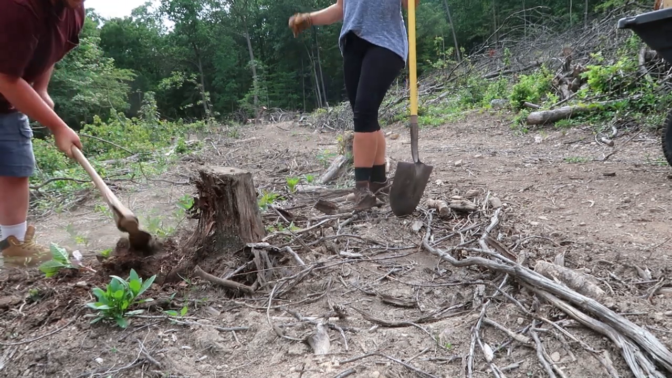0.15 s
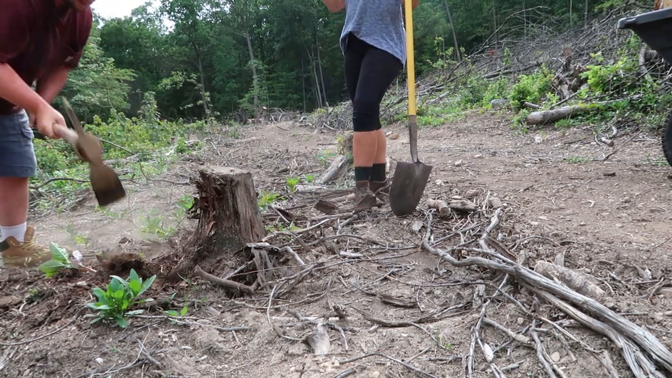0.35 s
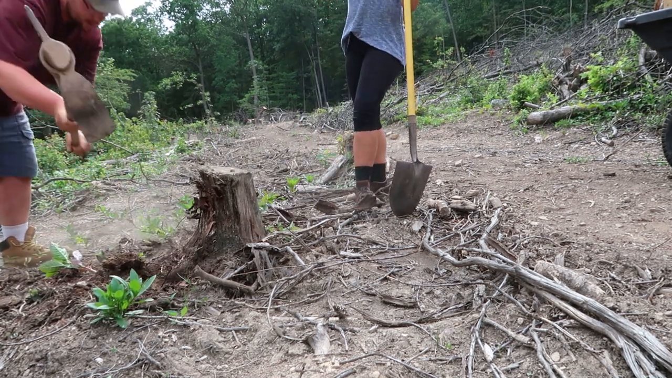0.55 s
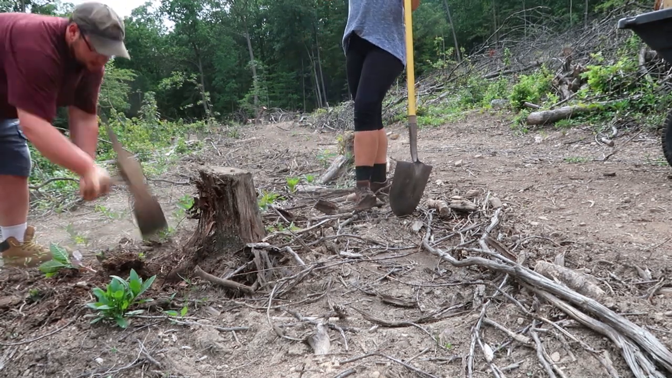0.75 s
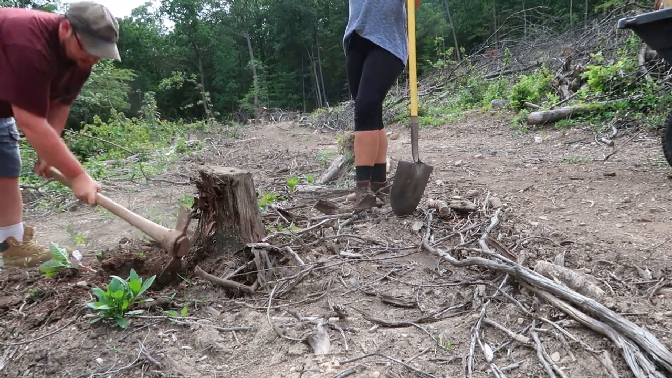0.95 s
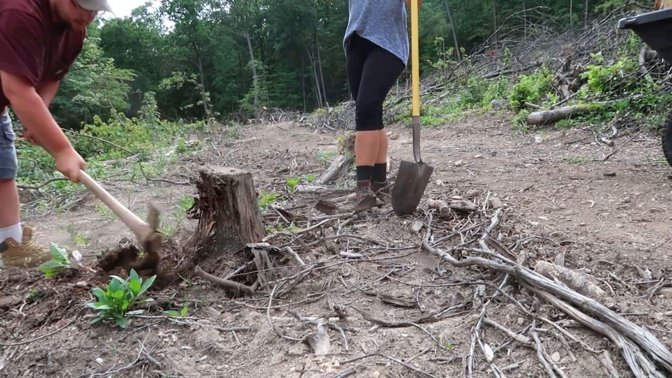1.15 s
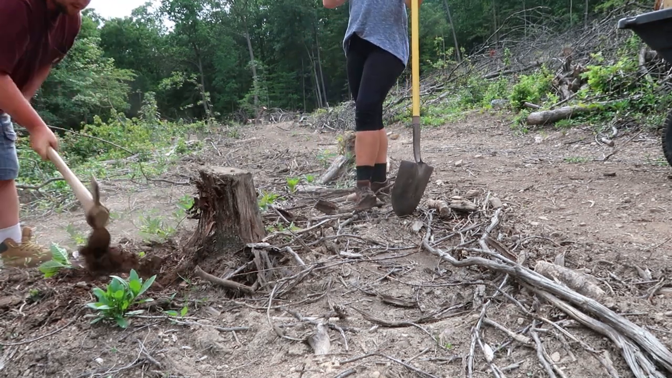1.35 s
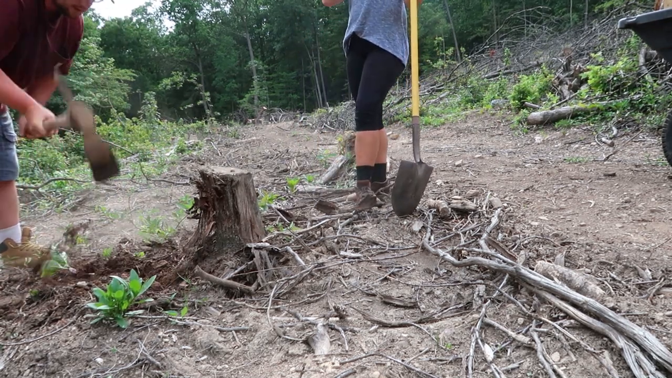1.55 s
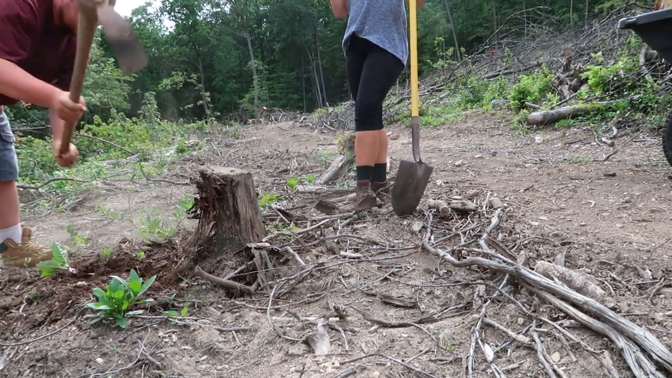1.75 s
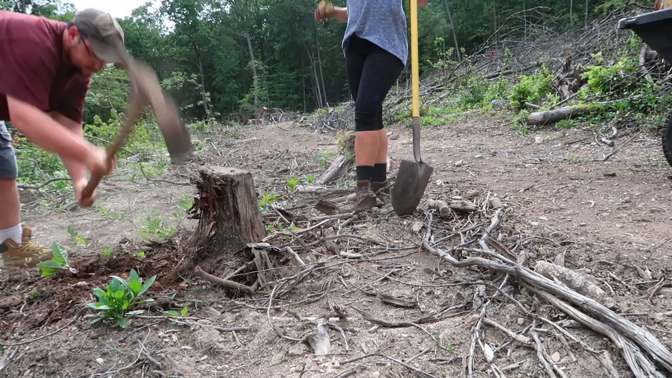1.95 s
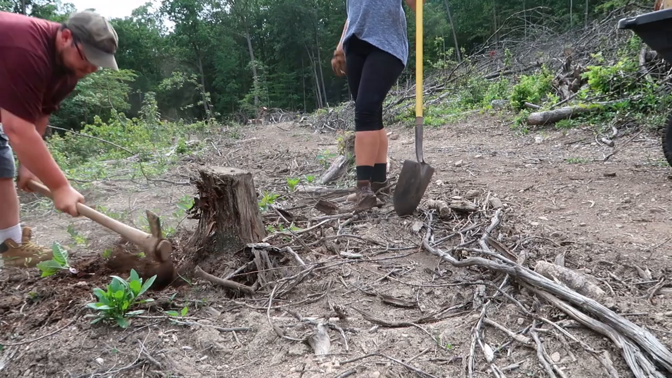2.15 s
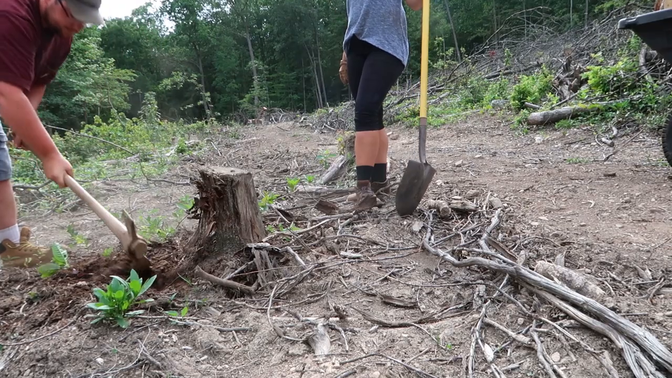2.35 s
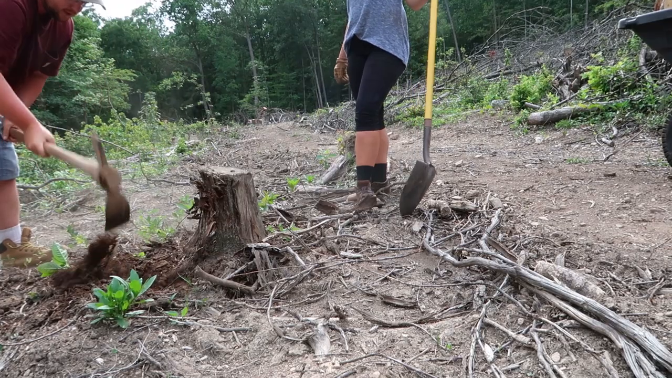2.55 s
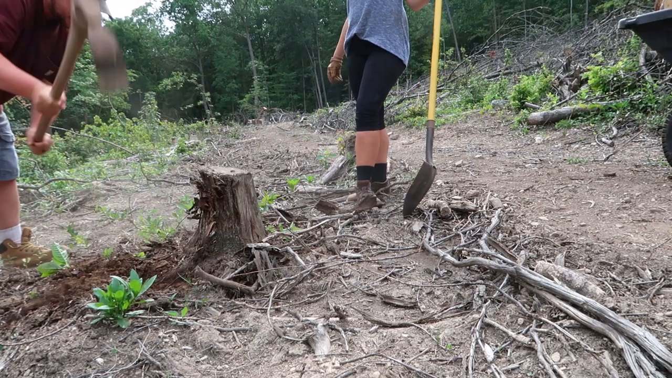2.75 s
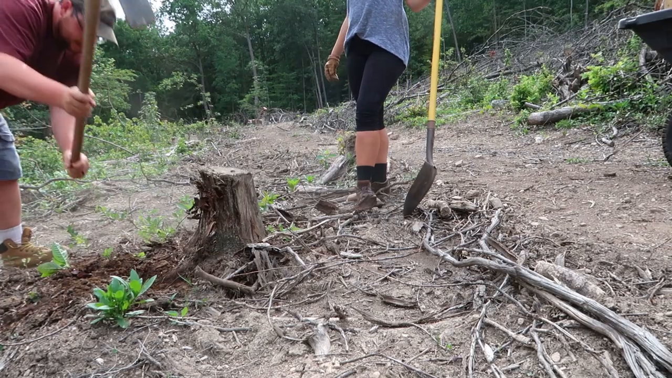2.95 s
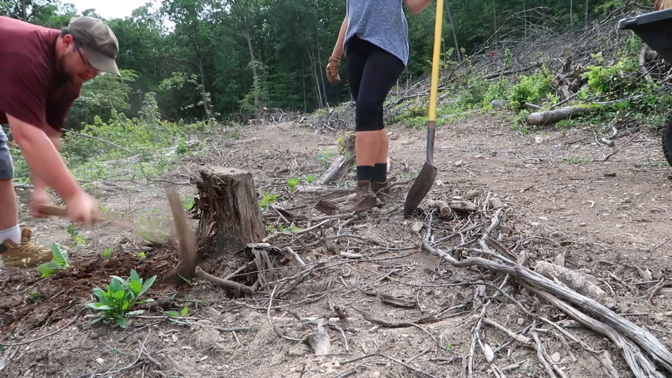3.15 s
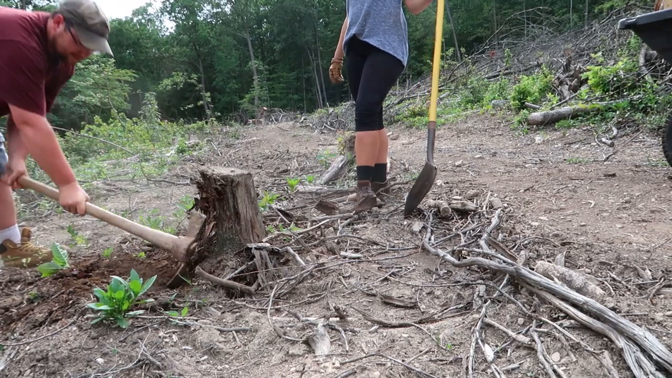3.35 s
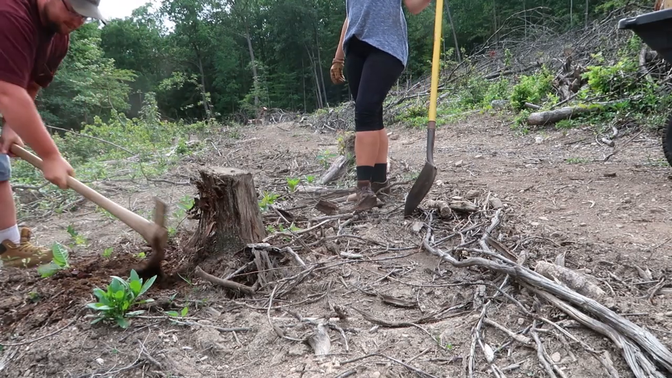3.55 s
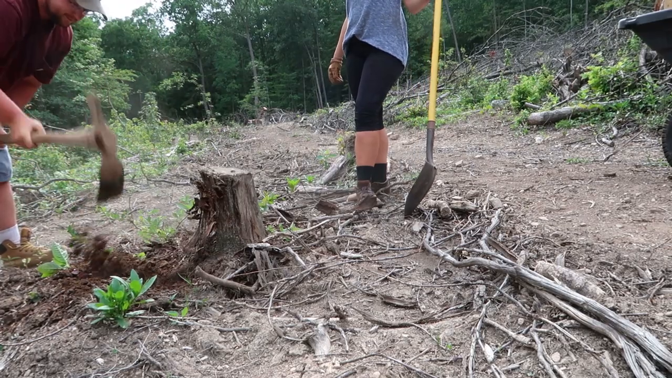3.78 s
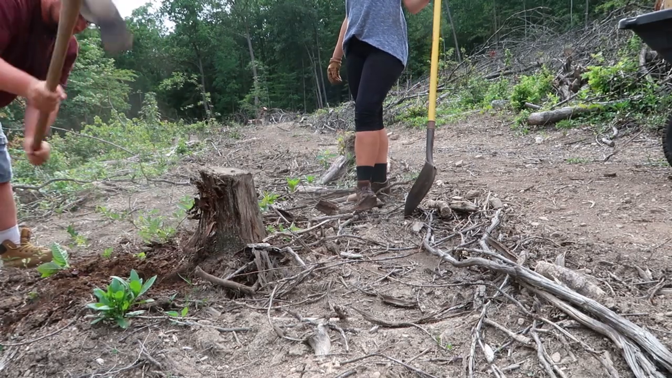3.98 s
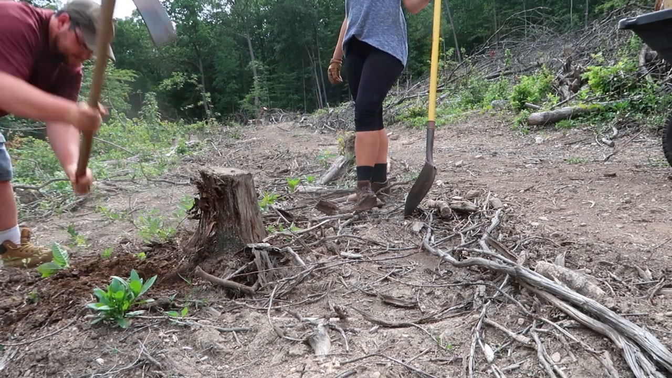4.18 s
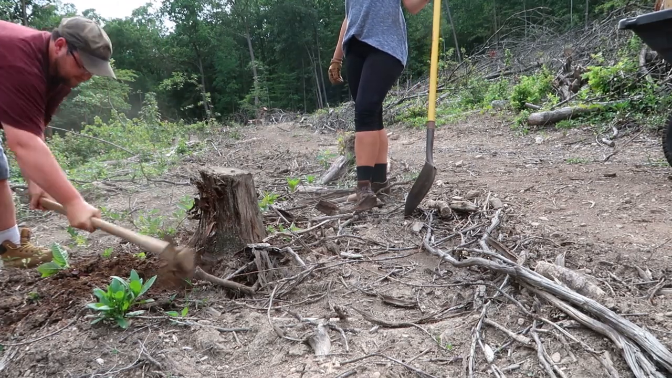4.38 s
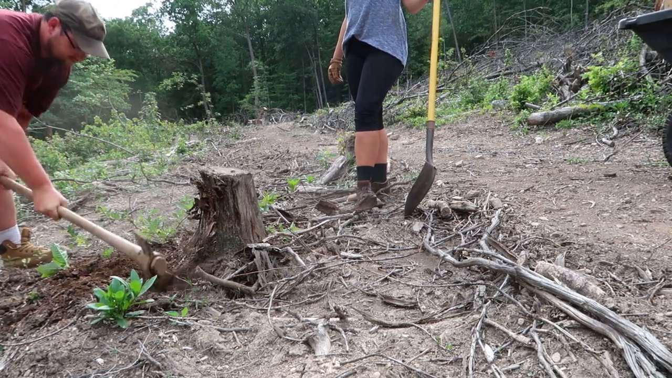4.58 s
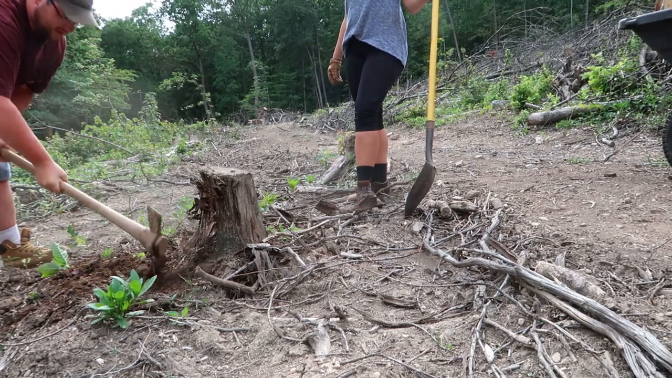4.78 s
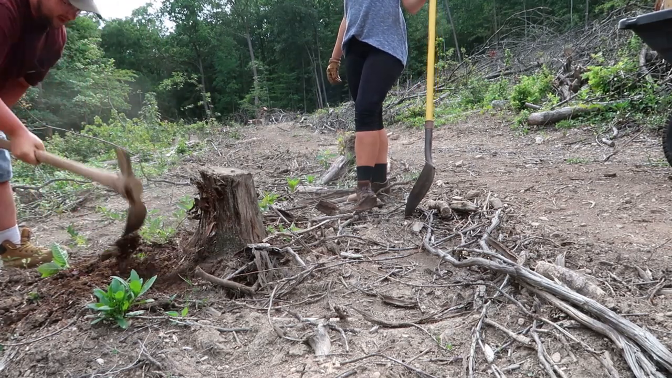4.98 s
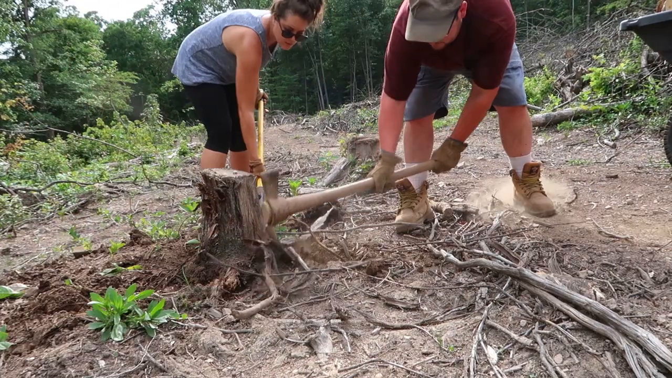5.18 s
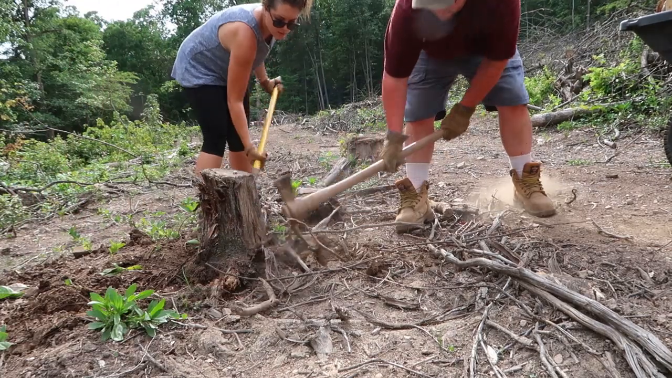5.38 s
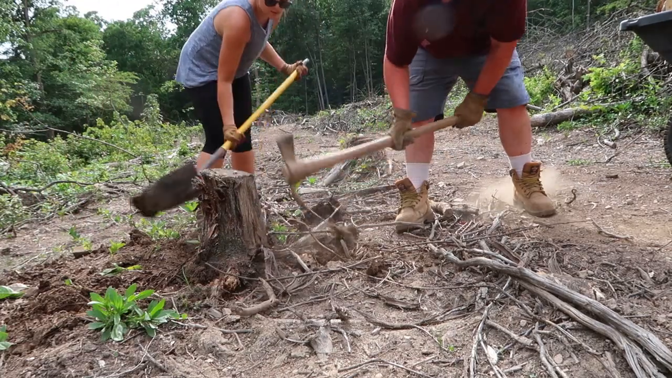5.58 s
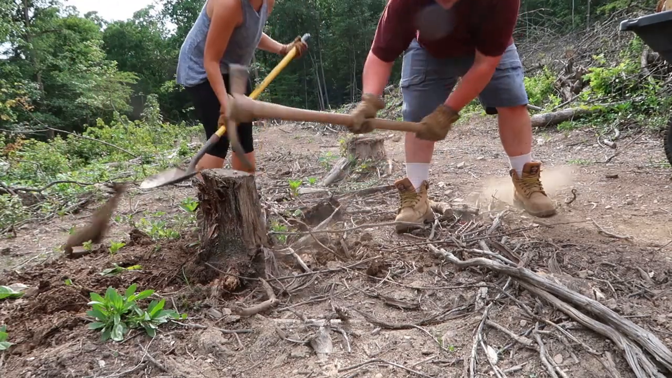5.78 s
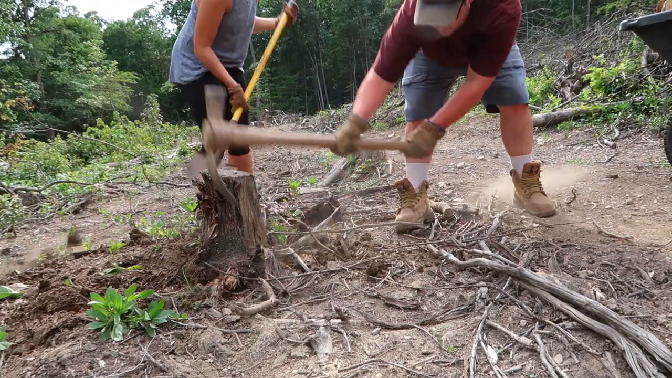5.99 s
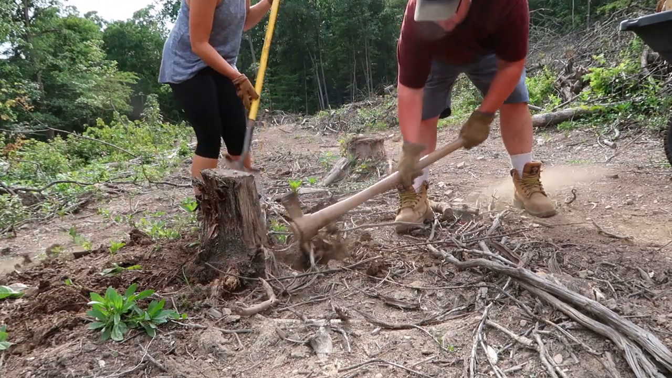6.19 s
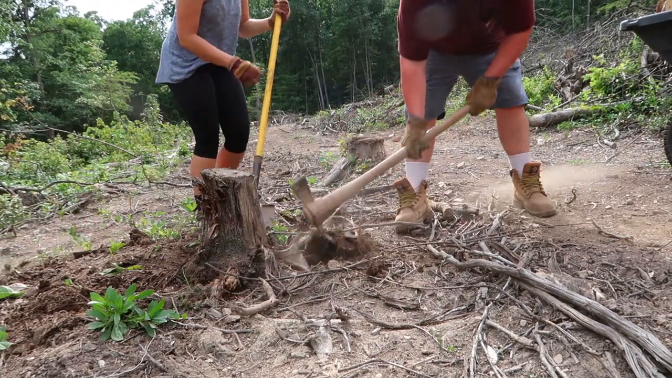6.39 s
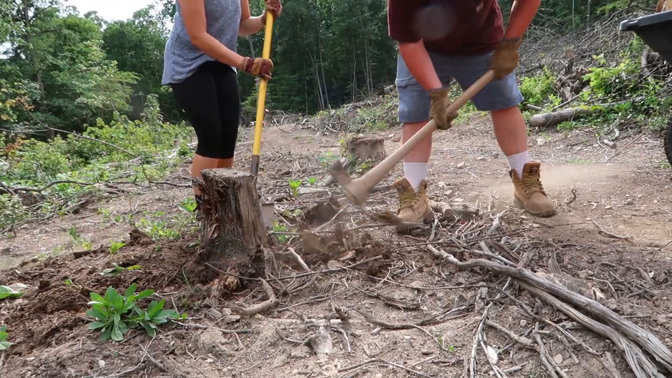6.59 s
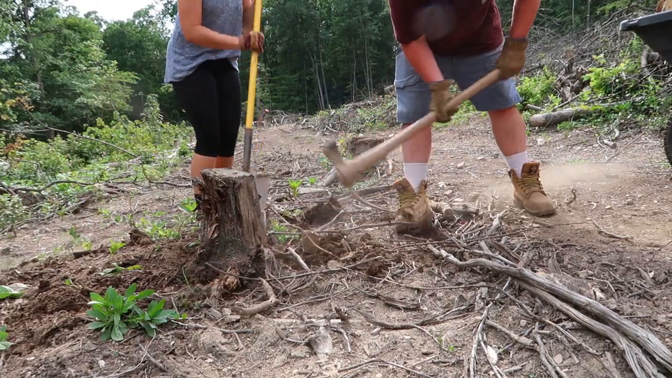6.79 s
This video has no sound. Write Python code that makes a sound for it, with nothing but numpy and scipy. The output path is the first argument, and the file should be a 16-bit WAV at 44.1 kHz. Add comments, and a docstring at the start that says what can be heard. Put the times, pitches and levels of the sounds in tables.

```python
"""A mattock bites into stony soil by a stump in a forest clearing; later a shovel scrapes beside it.
Each stroke is a string of grinding bursts: stone cracks, roots knock, grit sprays and the steel head rings.
Low pushes thump the ground, loose soil trickles and rumbles back, and pebbles tick as short bursts.
Trees return a faint echo of the work; light wind and a drone (shaped noise) and a bird (sines) lie far off."""
import sys
import numpy as np
from scipy import signal
from scipy.fft import rfft, irfft, next_fast_len
from scipy.io import wavfile
from scipy.ndimage import uniform_filter1d, map_coordinates

SR = 44100
rng = np.random.default_rng(int(sys.argv[2]) if len(sys.argv) > 2 else 0)


def generate_wav(sig):
    """Save sig (samples, or channels by samples) to the path in sys.argv[1] as 16-bit PCM at SR."""
    pcm = np.round(np.clip(np.atleast_2d(sig).T, -1, 1) * 32767).astype(np.int16)
    wavfile.write(sys.argv[1], SR, pcm)


N = 301203  # length [samples]

# far wind and drone: (time [s], wind level [dB], drone level [dB])
FAR_LEVELS = [(0, -55.5, -60.5), (.6, -62, -57), (1.8, -59, -59), (2.7, -59.5, -60.5), (4.1, -63, -61.5),
              (5.1, -56.5, -57), (6, -58, -54), (6.83, -57.5, -66)]
# colour of the far wind: (frequency [Hz], relative level [dB])
WIND_COLOUR = [(12, -34), (20, -3), (75, -18), (102, -18), (283, -26.5), (300, -17.5), (390, -54.5),
               (660, -120)]
# colour of the far drone: (frequency [Hz], relative level [dB])
DRONE_COLOUR = [(88, -39.5), (150, -8.5), (287, -6), (319, -5), (454, -2), (481, -1.5), (693, -3.5),
                (808, -1.5), (941, -9.5), (1340, -11), (1450, -16.5), (2500, -42.5), (3250, -62),
                (5500, -120)]
# faint far bird notes: (start [s], length [s], starting pitch [Hz], peak level [dB])
BIRD_NOTES = [(.555, .04, 3850, -75), (.66, .045, 4120, -70), (.74, .13, 3650, -71)]
# echo of the clearing: (frequency [Hz], t60 [s])
TREE_DECAY = [(200, 0.62), (2000, 0.23), (12000, 0.33)]
# showers of loose soil: (full at [s], held [s], crumbs level [dB], dust level [dB])
SOIL_SHOWERS = [(0, 0.015, -53.5, -60), (.2, 0.036, -63.5, -65), (.63, .6, -65.5, -79.5),
                (1.53, 0.02, -62, -62), (1.75, 0.13, -69, -73.5), (2.33, 0.11, -64, -75),
                (2.51, 0.23, -62, -67), (3.44, 0.02, -61, -68.5), (4.62, 0.016, -59, -68.5),
                (4.78, 0.066, -65, -70.5), (5.15, 0.064, -60.5, -75.5), (5.36, 0.11, -52.5, -52),
                (5.64, 0.11, -56.5, -62), (5.9, 0.22, -62, -65), (6.42, 0.19, -60, -62),
                (6.8, .05, -62, -82.5)]
# soil between showers: (crumbs level [dB], dust level [dB])
SOIL_BED = (-73.5, -77.5)
# colour of the crumbs: (frequency [Hz], relative level [dB])
CRUMB_COLOUR = [(710, -16), (1200, -3.5), (1260, 0), (1340, -1.5), (1730, -3), (1890, -2.5), (8000, -13),
                (10400, -42), (17600, -120)]
# colour of the dust: (frequency [Hz], relative level [dB])
DUST_COLOUR = [(3530, -40.5), (6000, -10), (7730, -6), (10600, 1), (15000, -0.5), (16100, -7.5),
               (16300, -12), (16500, -49.5)]
# pebbles landing: (time [s], peak level before spray [dB], centre [Hz])
PEBBLE_LANDINGS = [(0.1242, -31.5, 11500), (0.183, -30, 3200), (0.3446, -47, 3500), (1.026, -41, 2380),
                   (1.1747, -44.5, 2380), (1.2237, -43, 2358), (1.4077, -35.5, 13300),
                   (1.5369, -41.5, 4180), (2.707, -42, 9700), (2.9755, -44, 5080), (3.5548, -46, 2350),
                   (3.5982, -36.5, 1408), (4.596, -35, 2532), (4.7067, -32.5, 2140), (4.774, -41, 2410),
                   (4.81, -46, 13000), (4.854, -47, 13500), (5.1477, -33, 11200), (5.206, -34, 12300),
                   (5.3292, -35, 3500), (5.3467, -31, 10400), (5.462, -27, 12300), (5.632, -41, 1990),
                   (5.8046, -14.5, 12700), (6.3, -40, 12400), (6.509, -34, 11500), (6.574, -41, 10500),
                   (6.627, -25.5, 6300), (6.633, -23.5, 13700), (6.6601, -27.5, 2180),
                   (6.6615, -29.5, 6970), (6.6862, -37, 12100), (6.7772, -39.5, 10870)]
# soft lumps landing: (time [s], peak level before spray [dB], centre [Hz])
CLOD_LANDINGS = [(0.468, -48, 700), (2.559, -40.5, 530), (2.603, -45.5, 430), (2.647, -46, 427),
                 (3.447, -57, 382), (5.833, -36.5, 845)]
# a hard stone chips the steel: (time [s], peak level before spray [dB], centre [Hz])
STONE_CLINKS = [(5.12, -28, 3010)]
# shovel blade modes: (frequency [Hz], relative level [dB], t60 [s])
BLADE_MODES = [(890, -8, .25), (1450, -4, .1), (1960, -7, .15), (2225, 2, .28), (2400, 1, .18),
               (2760, -8, .25), (3340, -5, .18), (3640, -7, .22), (3810, -6, .18), (4460, -6, .18),
               (4915, -4, .13), (6350, -7, .13), (6800, -8, .13), (7700, -8, .11)]
# pushes of the shovel over stones: (full at [s], held [s], rasp level before jerks [dB])
SHOVEL_PUSHES = [(5.636, 0.013, -56), (5.697, .035, -48.5), (5.742, 0.039, -40), (5.835, 0.007, -52.5)]
# jerks of the mattock head through grit: (full at [s], held [s], rasp level before jerks [dB])
HEAD_DRAGS = [(5.345, 0.004, -50), (5.43, 0.0045, -41), (5.485, 0.0036, -44), (5.54, 0.0056, -50.5)]
# the edge slides through loose soil and bites: (bite [s], slide length [s])
EDGE_BITES = [(0.924, .016), (3.274, .008), (4.459, .009)]
# the head's weight lands in the ground: (time [s], thump peak level [dB])
GROUND_THUMPS = [(0.9197, -24.5), (0.9253, -23.5), (0.9312, -25), (0.9464, -24), (0.989, -32), (2.138, -25),
                 (2.1685, -27), (2.2133, -28), (2.2413, -34), (3.276, -20.5), (3.281, -26), (3.2868, -25),
                 (3.2959, -24), (3.3388, -36), (4.459, -17), (4.4659, -11.5), (4.5118, -35), (5.22, -34),
                 (5.259, -20), (6.202, -32), (6.251, -40), (6.494, -36.5)]
# mattock head modes when free: (frequency [Hz], relative level before scatter [dB], t60 before damping [s])
HEAD_MODES = [(740, -8, .06), (1480, -5, .05), (1900, -8, .04), (2430, 0, .12), (3090, -8, .08),
              (3380, -9, .08), (3820, -11, .12), (4600, -9, .08), (5040, -11, .07), (5750, -10, .08),
              (6440, -10, .09), (6930, -13, .08), (8050, -14, .09), (8700, -15, .08), (9480, -15, .12),
              (10800, -16, .12), (11250, -18, .16), (11900, -17, .1), (12700, -17, .1), (14600, -18, .12)]
# contacts: (time [s], crack peak level [dB], crack centre [Hz], knock level re crack [dB], grinding t60 [s])
MATTOCK_CONTACTS = [(0.9188, -34, 2400, 13.5, 0.065), (0.9258, -17, 1520, 8.5, 0.012),
                    (0.9325, -32.5, 2640, 12, 0.039), (0.9442, -26.5, 2270, 6.5, 0.067),
                    (0.964, -30, 2250, -3, 0.11), (0.9798, -23, 2140, 0.5, 0.054),
                    (0.9913, -27, 2400, -12, 0.017), (1.3101, -29.5, 2240, -1, 0.042),
                    (2.139, -1, 4520, -12.5, 0.018), (2.1465, -19.5, 2040, 4.5, 0.048),
                    (2.1688, -41.5, 1550, 16, 0.044), (2.2052, -29.5, 1970, -12, 0.079),
                    (2.2144, -36, 2290, 11, 0.036), (2.2405, -37, 2270, 8.5, 0.12),
                    (2.2636, -46, 2400, 3, 0.054), (3.2731, -9.5, 2880, -14, 0.053),
                    (3.277, -3, 2440, -5, 0.019), (3.2812, -24.5, 2540, 17, 0.029),
                    (3.287, -25, 2720, -5, 0.02), (3.2964, -43, 2370, 10, 0.15),
                    (3.3393, -17.5, 2080, -6, 0.039), (4.4591, -2.5, 2060, -4, 0.019),
                    (4.4654, -29, 3180, 3, 0.072), (4.5106, -38, 2260, -3, 0.28),
                    (4.6134, -38.5, 2380, 3.5, 0.065), (5.222, -7, 5000, -13.5, 0.077),
                    (5.23, -29.5, 2030, 16.5, 0.09), (5.246, -13.5, 1350, 8, 0.02),
                    (5.2602, -50, 2080, 8, 0.031), (5.3465, -32.5, 2620, 2, 0.019),
                    (5.3833, -34, 2300, 3, 0.15), (5.403, -30.5, 1350, 11, 0.045),
                    (5.4927, -14.5, 5300, -14.5, 0.035), (6.203, 4, 2120, -11.5, 0.013),
                    (6.2123, -19, 2520, 7, 0.051), (6.2238, -13.5, 2210, -11, 0.025),
                    (6.2494, -42.5, 2370, 14, 0.025), (6.38, -36, 3870, -10.5, 0.2),
                    (6.4105, -17, 4030, -11, 0.038), (6.4442, -45, 1950, 8, 0.02),
                    (6.4943, -37.5, 6600, 0.5, 0.031)]
# what each stroke meets: (stroke start, just before its first contact [s],
# grit spray re crack at the usual crack pitch [dB], steel ring of a 0 dB crack [dB],
# rumble of soil sliding back [dB])
STROKE_SETTINGS = [(0.91, -35, -19.5, -53), (1.3, -2.5, -20, -64.5), (2.13, -24, -21, -66),
                   (2.2, -18.5, -18.5, -60), (3.27, -23, -20, -56.5), (3.33, -12, -20, -59.5),
                   (4.45, -36, -22.5, -60), (4.5, -7, -17.5, -50), (5.21, -12, -39, -60),
                   (5.34, -14, -33, -56.5), (6.19, -42, -19, -59.5), (6.37, -4, -17.5, -54)]

BIRD_SAG_HZ_PER_S = 1500
ECHO_DB = -24.0
SLIDE_HELD_S = 0.043
ENTRY_DB, ENTRY_SWELL_DB = -29, 16  # gain at the bite, and rise up to it
GRIT_DB_PER_OCTAVE, USUAL_CRACK_HZ = 13.5, 2300  # brighter cracks throw more grit
RING_GROWS = .55  # dB of ring per dB of crack
INPUT_CEILING = .85  # full scale = 1
TOP_HZ = 16100  # middle of the fade at the top of the band


def amp(db):
    """Level in dB to amplitude."""
    return 10 ** (np.asarray(db) / 20)


def unit(x):
    """Scale to rms 1."""
    return x / np.sqrt(np.mean(x ** 2) + 1e-20)


def peak(x):
    """Scale to peak 1."""
    return x / np.max(np.abs(x))


def along(points, hz):
    """Read (frequency [Hz], value) points on a log frequency axis."""
    f, v = np.transpose(points)
    return np.interp(np.log(hz + 1), np.log(f + 1), v)


def gains(rows):
    """One gain per sample for each dB column; practically silent outside the table."""
    times, *columns = np.transpose(rows)
    t = np.arange(N) / SR
    return [amp(np.interp(t, times, db, -150, -150)) for db in columns]


def swells(rows, rise_db_s, fall_db_s):
    """Each row rises, holds and falls; powers add into one gain for each dB column."""
    t = np.arange(N) / SR
    shapes = []
    for s, held, *_ in rows:
        before = np.clip(s - t, 0, None)
        after = np.clip(t - s - abs(held), 0, None)
        shapes.append(amp(-rise_db_s * before - fall_db_s * after))
    levels = amp(np.array(rows)[:, 2:])
    return np.sqrt(levels.T ** 2 @ np.array(shapes) ** 2)


def filtered(x, response):
    """Multiply the spectrum of x by a response of frequency."""
    m = next_fast_len(x.shape[-1] + SR // 8)
    spectrum = rfft(x, m) * response(np.fft.rfftfreq(m, 1 / SR))
    return irfft(spectrum, m)[..., :x.shape[-1]]


def hump(hz, width_hz):
    """One causal resonance, 1 at its top."""
    return lambda f: 1j * f * width_hz / (hz * hz - f * f + 1j * f * width_hz)


def ringing(modes, scatter_db, damping=1):
    """Steel rings as a sum of modes, scattered in strength; damping widens and shortens them."""
    humps = []
    for hz, db, t60 in modes:
        strength = amp(db + scatter_db * rng.standard_normal())
        width_hz = damping * np.log(1000) / np.pi / t60
        humps.append((strength, hump(hz, width_hz)))
    return lambda f: sum(g * h(f) for g, h in humps)


def grit(n, rate, spread_db, hiss):
    """Single grains at random moments (rate per second), some bigger than the rest, over a hiss."""
    hits = rng.random(n) < rate / SR
    size = amp(spread_db * np.minimum(rng.exponential(size=n), 2))
    grains = hits * rng.standard_normal(n) * size
    return unit(unit(grains) + hiss * rng.standard_normal(n))


def rush(x, colour, patchy_db):
    """Colour x, with time-frequency patches of random gain, rms 1."""
    z = signal.stft(x, nperseg=512)[2]
    across_pitch = uniform_filter1d(rng.standard_normal(z.shape), 6, 0)
    patches = uniform_filter1d(across_pitch, 10, 1)
    patchy = signal.istft(z * amp(patchy_db * unit(patches)), nperseg=512)[1][:N]
    return unit(filtered(patchy, lambda hz: amp(along(colour, hz))))


def distance():
    """Far off, low wind and a drone: coloured noise under slow level curves."""
    wind_gain, drone_gain = gains(FAR_LEVELS)
    wind = rush(rng.standard_normal(N), WIND_COLOUR, patchy_db=1.5)
    drone = rush(rng.standard_normal(N), DRONE_COLOUR, patchy_db=.8)
    return wind_gain * wind + drone_gain * drone


def bird():
    """Soft far whistles: single sines that sag a little in pitch."""
    out = np.zeros(N)
    for s, length, hz, db in BIRD_NOTES:
        t = np.arange(round(length * SR)) / SR
        cycles = (hz - BIRD_SAG_HZ_PER_S * t / 2) * t
        out[round(s * SR):][:len(t)] = amp(db) * np.hanning(len(t)) * np.sin(2 * np.pi * cycles)
    return out


def trees(x):
    """The clearing's echo: a noise tail in which each frequency dies at its own speed."""
    _, t, z = signal.stft(rng.standard_normal(SR // 2), SR, nperseg=256)
    hz = np.fft.rfftfreq(256, 1 / SR)
    decay = amp(-60 * t / along(TREE_DECAY, hz)[:, None])
    tail = signal.istft(z * decay, SR, nperseg=256)[1]
    return signal.fftconvolve(x, tail / np.linalg.norm(tail))[:N]


def soil():
    """Crumbs patter and dust hisses off the lifted blade: sparse grains over noise."""
    showers = swells(SOIL_SHOWERS, rise_db_s=70.5, fall_db_s=46)
    crumb_gain, dust_gain = showers + amp(SOIL_BED)[:, None]
    patter = rush(grit(N, 200, 4.5, 1.3), CRUMB_COLOUR, patchy_db=1.2)
    sift = rush(grit(N, 200, 4, 2), DUST_COLOUR, patchy_db=1.2)
    return crumb_gain * patter + dust_gain * sift


def sliding():
    """Loosened soil rumbles back into the hole with each stroke: low-pitched grit."""
    rows = [(s, SLIDE_HELD_S, db) for s, _, _, db in STROKE_SETTINGS]
    level, = swells(rows, rise_db_s=900.5, fall_db_s=44.5)
    rumble = filtered(grit(N, 150, 3, 0.51), lambda f: hump(300, 700)(f) ** 2)
    return level * unit(rumble)


def landings(rows, width, t60, spray_db):
    """Short dry bursts, each with one pitch (narrow clinks, wide clicks) and some spray of all pitches."""
    out, t = np.zeros(N + SR), np.arange(SR // 10) / SR
    for s, db, hz in rows:
        attack = 1 - np.exp(-t / (0.078 * t60))
        burst = rng.standard_normal(len(t)) * amp(-60 * t / t60) * attack
        resonance = hump(hz, width * hz)
        body = peak(filtered(burst, lambda f: resonance(f) ** 2))
        out[round(s * SR):][:len(t)] += amp(db) * (body + amp(spray_db) * peak(burst))
    return out[:N]


def scrape(pressure, modes, rasp_hz, ring_db, tilt):
    """Grit rasps along steel in uneven jerks and keeps its modes ringing."""
    # 90 random jerk points a second, smoothly joined
    jerks = amp(2.2 * map_coordinates(rng.standard_normal(1000), [np.arange(N) * 90 / SR]))
    rasp = filtered(grit(N, 1600, 1.4, 0.31), lambda f: hump(rasp_hz, 2.2 * rasp_hz)(f) ** 2)
    rasp = pressure * jerks * unit(rasp)
    steel = ringing(modes, scatter_db=0)
    ring = filtered(rasp, lambda f: steel(f) * (f / rasp_hz) ** tilt)
    return rasp + amp(ring_db) * ring


def entries():
    """The edge pushes soil aside before a bite: a short swelling crunch of grit."""
    out = np.zeros(N)
    for s, slide in EDGE_BITES:
        n = round(slide * SR)
        swell = amp(ENTRY_DB + np.linspace(-ENTRY_SWELL_DB, 0, n))
        out[round(s * SR) - n:][:n] = swell * grit(n, 5900, 2.46, 1.0)
    return filtered(out, lambda f: hump(3000, 6000)(f) ** 2)


def ground():
    """One low push through ground resonances for each thump, with soil settling after it."""
    out, t = np.zeros(N + SR), np.arange(SR // 4) / SR

    def earth(f):
        return (hump(82, 38)(f) + 1.4 * hump(240, 240)(f)) * hump(120, 260)(f)

    for s, db in GROUND_THUMPS:
        push = t * np.exp(-t / .0016)
        settling = .00015 * rng.standard_normal(len(t)) * amp(-60 * t / .12)
        out[round(s * SR):][:len(t)] += amp(db) * peak(filtered(push + settling, earth))
    return out[:N]


def mattock():
    """Every contact is a dying burst of grinding heard through stone, root and steel."""
    out, t = np.zeros(N + SR), np.arange(SR // 4) / SR
    for s, db, hz, knock_db, t60 in MATTOCK_CONTACTS:
        # the latest stroke begun by this contact
        _, spray_db, ring_db, _ = [row for row in STROKE_SETTINGS if row[0] <= s][-1]
        t60 = np.clip(t60, .008, .3)
        attack = 1 - np.exp(-t / (0.00013 + 0.021 * t60))  # softer ground yields more slowly
        grind = grit(len(t), 4000, 10.0, 0.48) * amp(-60 * t / t60) * attack
        buried = ringing(HEAD_MODES, scatter_db=4, damping=11)  # packed soil damps the head
        crack = peak(filtered(grind, lambda f: hump(hz, 1.4 * hz)(f) ** 2 * (.4 + buried(f))))
        knock = peak(filtered(grind, lambda f: hump(800, 1200)(f) ** 2))
        spray = peak(filtered(grind, lambda f: hump(10500, 11000)(f) ** 2))
        steel = peak(filtered(grind, ringing(HEAD_MODES, scatter_db=5, damping=1.4)))
        grit_db = spray_db + GRIT_DB_PER_OCTAVE * np.log2(hz / USUAL_CRACK_HZ)
        contact = amp(db) * (crack + amp(knock_db) * knock + amp(grit_db) * spray)
        contact += amp(ring_db + RING_GROWS * db) * steel
        out[round(s * SR):][:len(t)] += contact
    return out[:N]


def scene():
    """The work and its echo from the trees, over moving soil and the far sounds."""
    background = distance() + bird()
    loose = soil() + sliding()
    work = landings(PEBBLE_LANDINGS, width=.8, t60=.008, spray_db=-11)
    work += landings(CLOD_LANDINGS, width=1.1, t60=0.05, spray_db=-28)
    work += landings(STONE_CLINKS, width=0.21, t60=0.021, spray_db=-8)
    push, = swells(SHOVEL_PUSHES, rise_db_s=1798, fall_db_s=427)
    work += scrape(push, BLADE_MODES, rasp_hz=2770, ring_db=18.5, tilt=0.071)
    drag, = swells(HEAD_DRAGS, rise_db_s=330, fall_db_s=425)
    work += scrape(drag, HEAD_MODES, rasp_hz=7600, ring_db=29, tilt=0.91)
    work += entries() + ground() + mattock()
    return (background + loose + work + amp(ECHO_DB) * trees(work))[None]


def record(dry):
    """The microphone input rounds off the hardest cracks, then the top of the band fades to nothing."""
    soft = dry / (1 + np.abs(dry / INPUT_CEILING) ** 4) ** (1 / 4)
    return filtered(soft, lambda hz: np.clip((TOP_HZ + 400 - hz) / 800, 0, 1) ** 3)


dry = scene()
out = record(dry)
generate_wav(out)
```